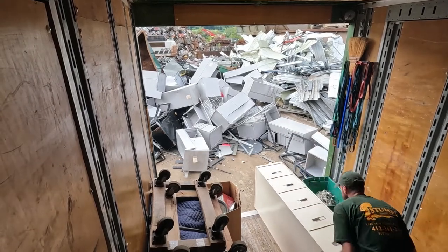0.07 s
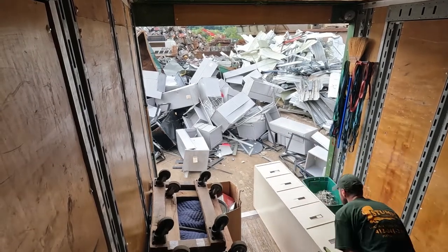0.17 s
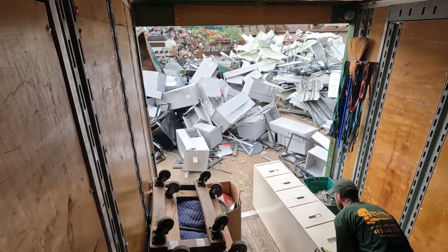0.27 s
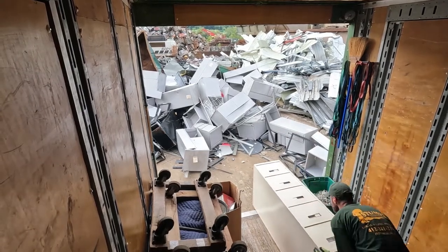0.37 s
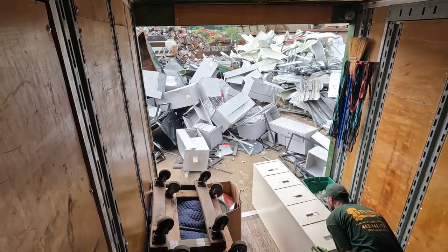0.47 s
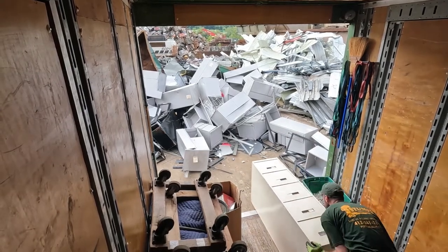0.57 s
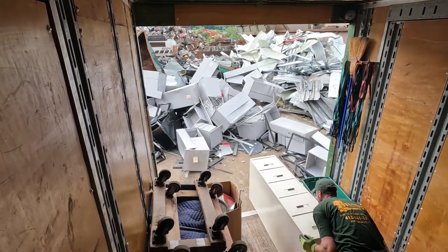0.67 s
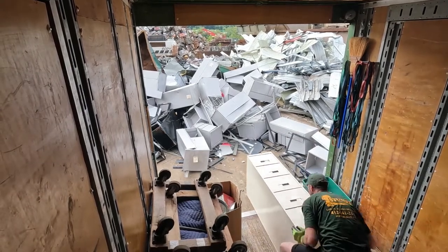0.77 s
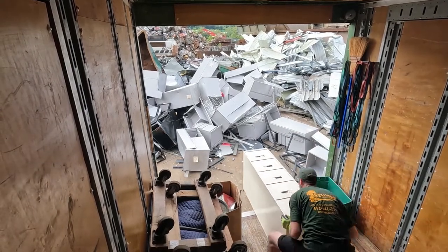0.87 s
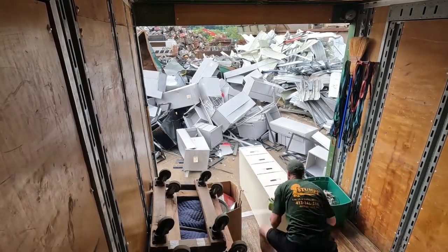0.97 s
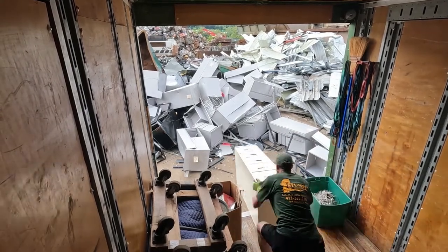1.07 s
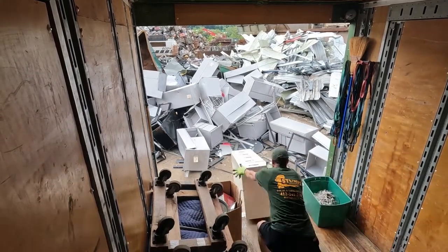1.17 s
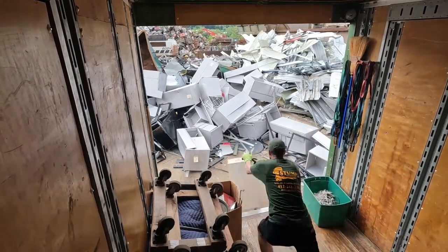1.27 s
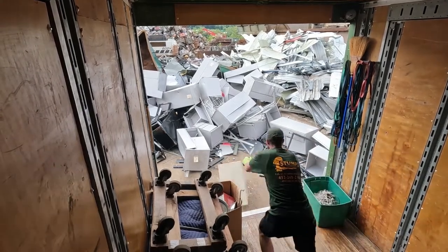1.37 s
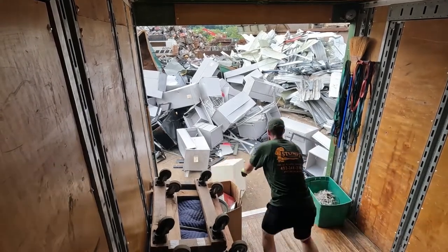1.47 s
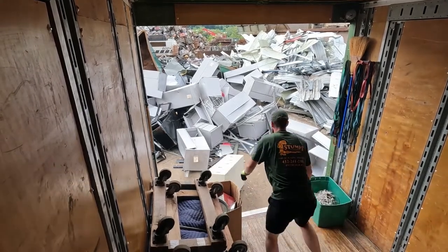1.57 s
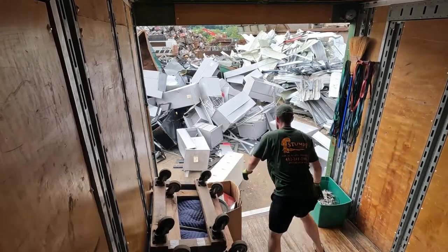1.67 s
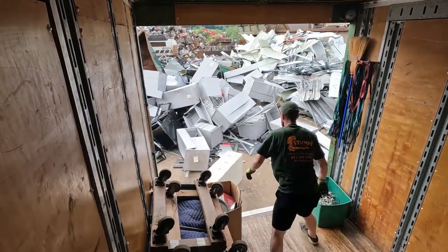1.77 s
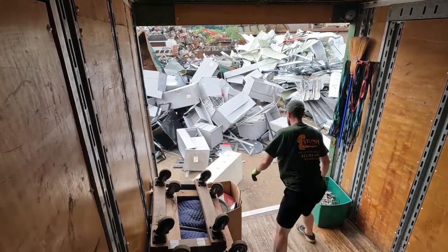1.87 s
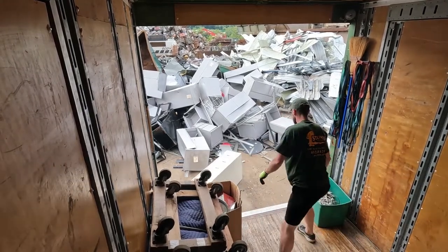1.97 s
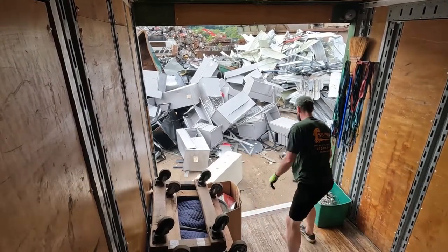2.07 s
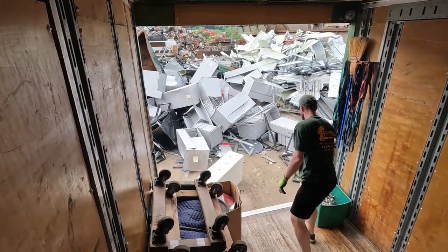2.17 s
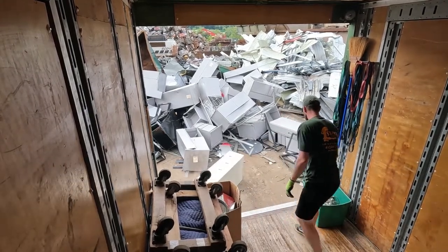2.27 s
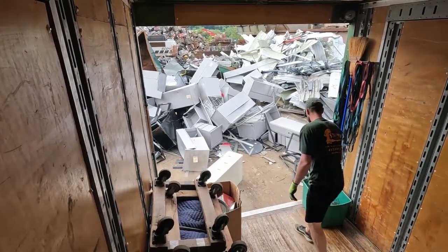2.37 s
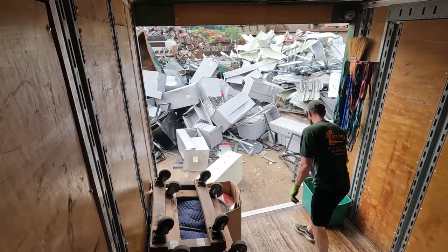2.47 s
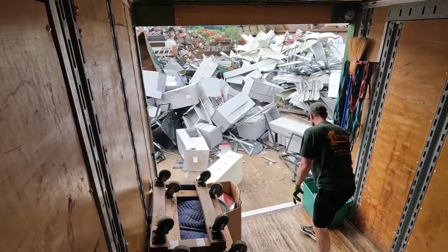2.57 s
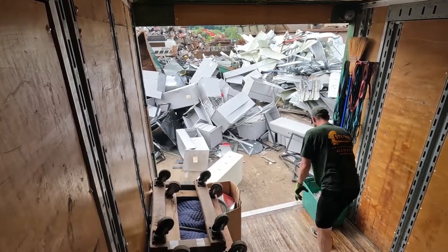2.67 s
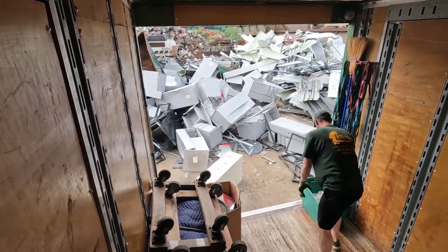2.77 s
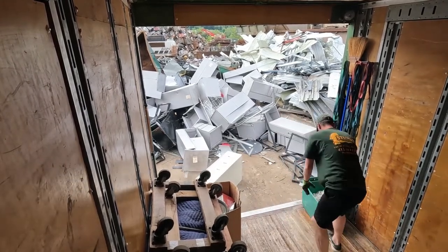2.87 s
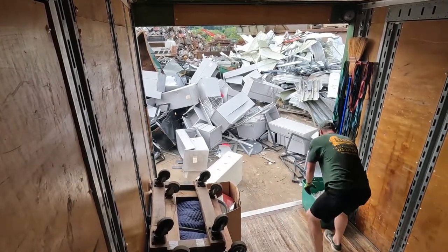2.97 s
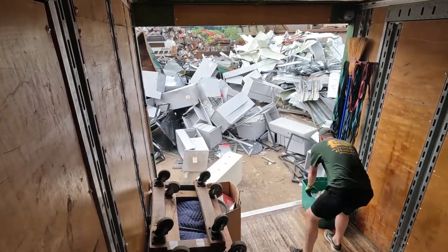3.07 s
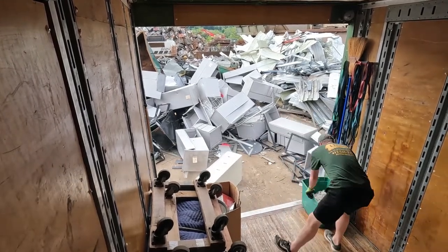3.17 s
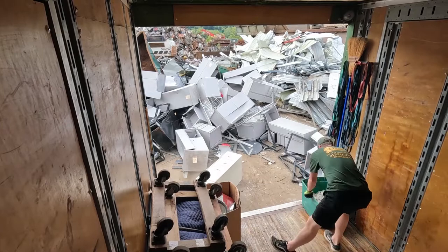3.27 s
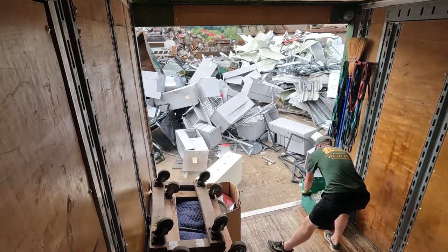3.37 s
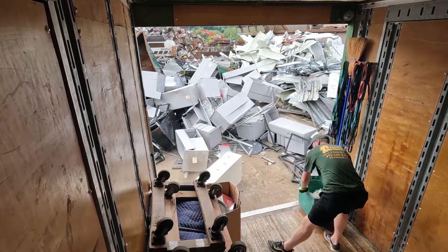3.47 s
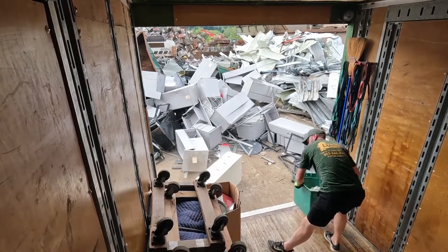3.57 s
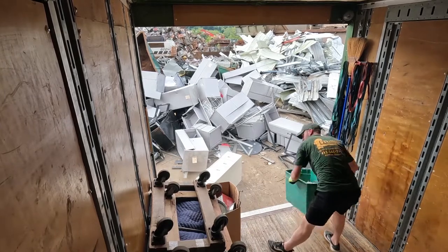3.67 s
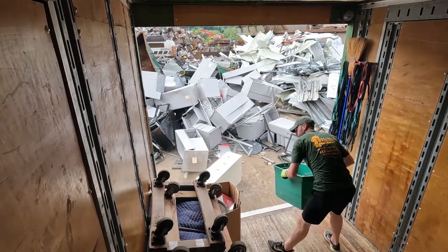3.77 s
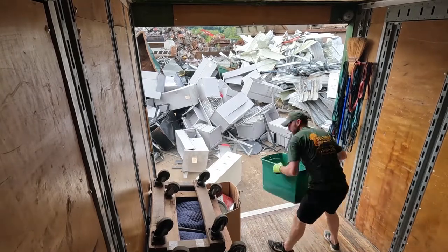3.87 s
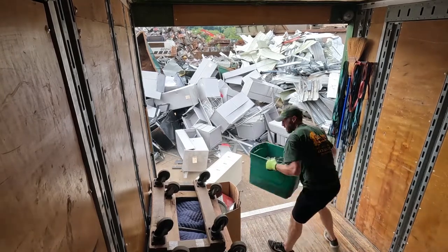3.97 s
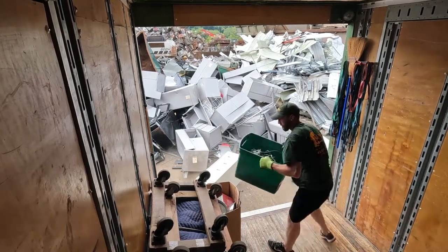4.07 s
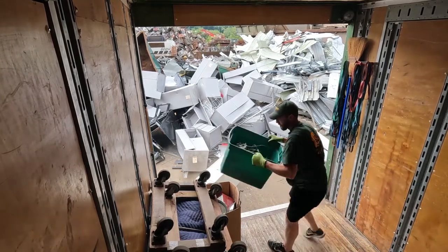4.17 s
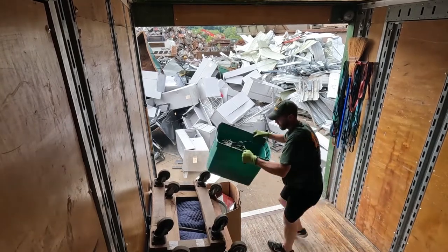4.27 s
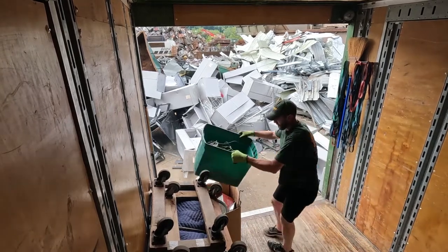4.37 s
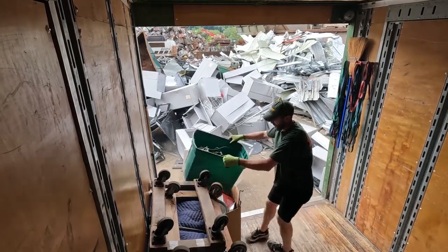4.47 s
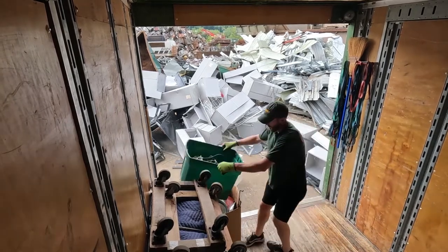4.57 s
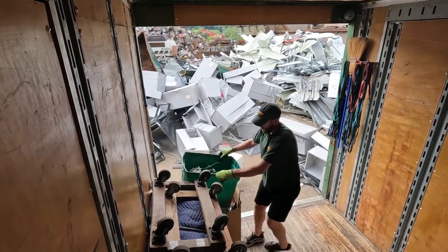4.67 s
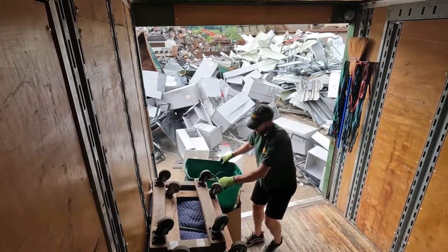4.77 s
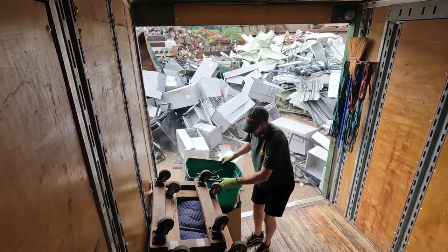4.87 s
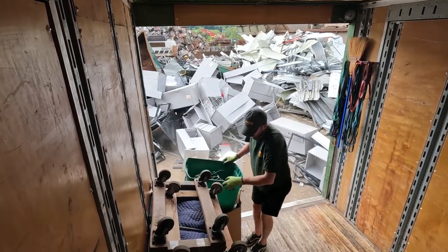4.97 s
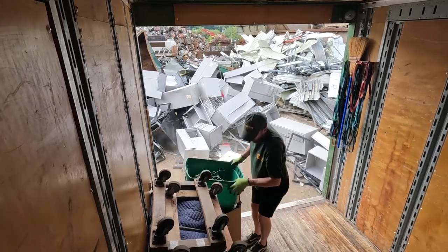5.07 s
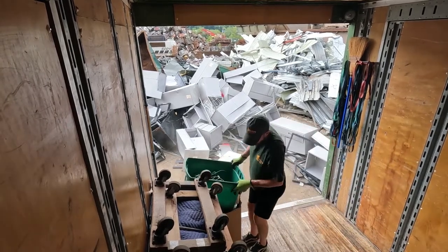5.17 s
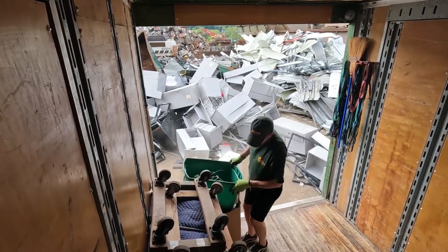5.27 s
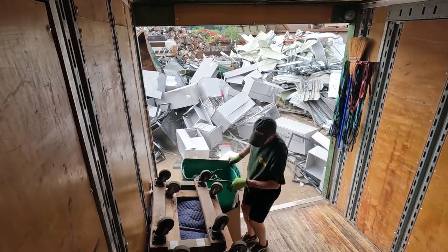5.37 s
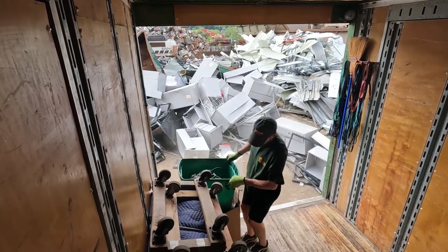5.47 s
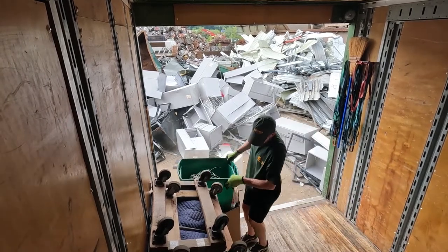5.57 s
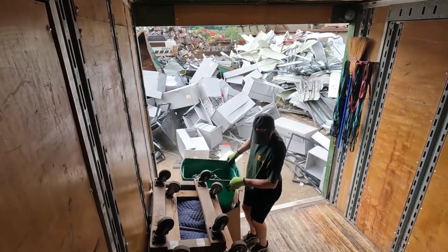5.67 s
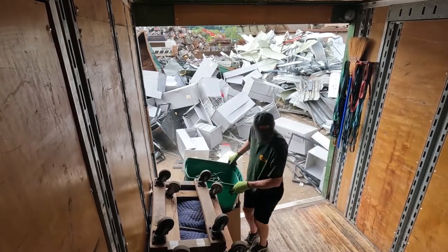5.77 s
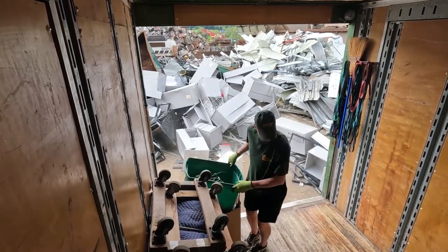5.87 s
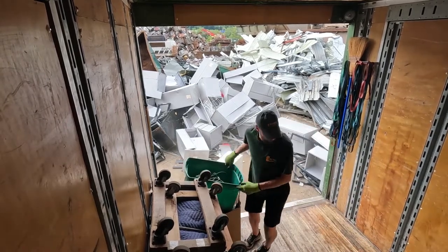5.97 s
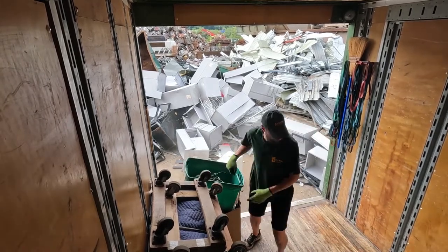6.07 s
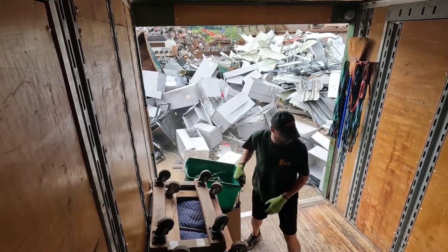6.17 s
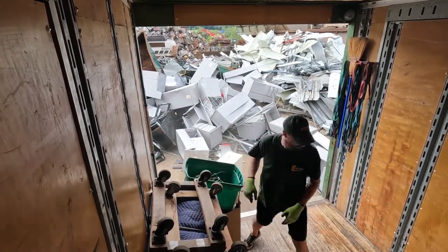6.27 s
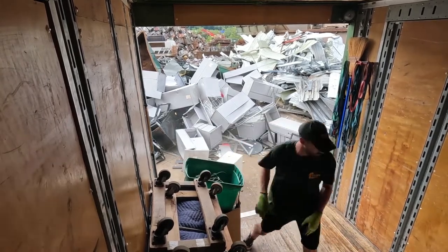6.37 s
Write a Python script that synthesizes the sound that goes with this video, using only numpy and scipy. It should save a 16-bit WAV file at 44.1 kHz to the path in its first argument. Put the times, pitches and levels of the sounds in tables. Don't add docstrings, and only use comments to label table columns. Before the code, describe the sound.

Inside a hollow truck box, a metal cabinet is shoved out with grinding and loud clanging, followed by footsteps and a parts bin set down hard.

```python
import sys
import numpy as np
from scipy import signal
from scipy.fft import rfft, irfft, next_fast_len
from scipy.io import wavfile
from scipy.ndimage import uniform_filter1d

SR = 44100
rng = np.random.default_rng(int(sys.argv[2]) if len(sys.argv) > 2 else 0)


def waveform_to_disk(signal):
    frames = np.transpose(np.atleast_2d(signal))
    scaled = np.clip(frames, -1, 1) * 32767
    samples = np.round(scaled).astype(np.int16)
    wavfile.write(sys.argv[1], SR, samples)


def how_loud(loudness_db):
    steps = np.asarray(loudness_db, float) / 20
    return 10 ** steps


N = 283959


def evened(x):
    return x / np.sqrt(np.mean(x ** 2) + 1e-20)


def read(points, hz):
    f, value = np.transpose(points)
    return np.interp(np.log(hz + 1), np.log(f + 1), value)


def colour(x, points):
    size = next_fast_len(x.shape[-1])
    gain = how_loud(read(points, np.fft.rfftfreq(size, 1 / SR)))
    return irfft(rfft(x, size) * gain, size)[..., :x.shape[-1]]


def split(x, hz):
    dull = signal.sosfiltfilt(signal.butter(2, hz, fs=SR, output="sos"), x)
    return evened(dull), evened(x - dull)


def ring(x, modes):
    total = 0
    for k, (hz, width, db) in enumerate(modes):
        b, a = signal.iirpeak(hz, hz / width, SR)
        total = total + (-1) ** k * how_loud(db) * signal.lfilter(b, a, x)
    return total


def slips(per_s, spread_db):
    size_db = spread_db * np.minimum(rng.exponential(1, N), 4)
    happens = rng.random(N) < per_s / SR
    return rng.standard_normal(N) * how_loud(size_db) * happens


def thud(x, body):
    low = evened(signal.sosfilt(signal.butter(2, 500, fs=SR, output="sos"), ring(x, body)))
    power = uniform_filter1d(uniform_filter1d(low ** 2, size=1500), size=1500)
    steady = 0.7
    return evened(low / (power + .05) ** (steady / 2))


def swings(events, rise_s, sag):
    out, t = np.zeros(N + 2 * SR), np.arange(SR) / SR
    for s, db, hz, t60 in events:
        swing = np.sin(2 * np.pi * hz * t * (1 - sag * np.minimum(t, .3)))
        envelope = how_loud(db - 60 * t / t60) * (1 - np.exp(-t / rise_s))
        out[round((s + 1) * SR):][:SR] += envelope * swing
    return out[SR:][:N]


def impacts(events, shell, pieces, body, crack_db, boom_db, fizz_db, rattle, fizz_s, bend):
    dull, bright = split(colour(slips(6000, 1.3), shell), 4310)
    dull = evened(dull + 0.5 * evened(ring(slips(600, 1.4), pieces)))
    boom = thud(slips(900, 2.0), body)
    out, t = np.zeros(N), np.arange(SR) / SR
    softening = 0.45
    for s, db, low_db, bright_db, t60 in events:
        start = round(s * SR)
        part = slice(start, min(start + SR, N))
        u = t[:part.stop - start]
        fall = how_loud(-60 * (np.maximum(u - rattle * t60, 0) / t60) ** bend)
        fizz = (1 - np.exp(-u / fizz_s)) * (1 + 1.45 * np.exp(-u / 0.025))
        crack_s = 0.0011 * how_loud(softening * max(-10 - db, 0))
        crack = (1 - np.exp(-u / crack_s)) * (1 + 0.25 * np.exp(-u / 0.0055))
        swell = 1 - np.exp(-u / 0.0094)
        out[part] += how_loud(bright_db + fizz_db) * fizz * fall * bright[part]
        out[part] += how_loud(db + crack_db) * crack * fall * dull[part]
        out[part] += how_loud(low_db + boom_db) * swell * fall * boom[part]
    return out


# frequency in Hz, level in dB, t60 in seconds.
BOARD_RING = [(58, -4, .3), (100, 0, 1.62), (109.2, -4, 0.81), (191, -6.5, .15), (263, -12.5, .4)]
CABINET = [(208, -0.5, 0.13), (328, -10, .22), (955, -5, .1), (1180, -16, .2)]
BIN_FLOOR = [(40, -20, 0.84), (115, -11.5, .31), (204, 0, .19), (259.4, -11, .2), (981, -10, 0.061),
             (1143, -29, 0.54), (2040, -19.5, 0.054), (2890, -19, .04), (3900, -24, .04), (5200, -25, .04),
             (6300, -21, .05)]
LOOSE_PART = [(3350, 1, .06), (7150, -8, .08)]
CARTON = [(191.7, 0.5, 0.11), (223, -3.5, 0.15), (860, -24, .058), (1144, -24, 0.063)]
BIN_RIM = [(38, 1, 0.36), (168, 0.5, .33), (298.7, -4, .23), (1916, -12, 0.11), (3640, -14, .05)]
# body struck, start in seconds, level in dB, pitch as a share of the mode's.
BLOWS = [(BOARD_RING, -0.00984, -13, 0.97), (CABINET, 1.482, -11, 1), (CABINET, 1.826, -4.5, 1.01),
         (CABINET, 1.6, -17, 1.03), (CABINET, 2.278, -21, 1.07), (CABINET, 2.712, -29, 1.0),
         (CABINET, 2.95, -29, 1.02), (BIN_FLOOR, 4.838, -1.7, 0.98), (LOOSE_PART, 4.862, -26, 1),
         (CARTON, 5.278, -9.5, 1), (CARTON, 5.297, -16, 1.1), (CARTON, 5.337, -29, 1.2),
         (BIN_RIM, 5.854, -18, 1)]


def blows():
    modes = []
    for body, s, db, pitch in BLOWS:
        for hz, mode_db, t60 in body:
            lag_s = min(0.785 / hz, .011)
            modes.append((s + lag_s, db + mode_db, hz * pitch, t60))
    return swings(modes, rise_s=0.0017, sag=0.11)


# start in seconds, crack in dB, boom in dB, fizz in dB, t60 in seconds.
CRASHES = [(0.0, -23, -9.5, -53, 0.74), (0.634, -38, -44, -60.5, 0.96), (0.873, -30.5, -18.5, -59, 1),
           (1.005, -24.5, -19, -63, 0.37), (1.086, -17.5, -10.5, -57, 0.95), (1.479, -9, -23, -35, 0.67),
           (1.634, -19, -48, -41.5, 0.56), (1.824, -9, -10, -33, 0.72), (2.082, -37, -28, -62, 0.76),
           (2.262, -25, -20, -51, 0.48), (2.315, -35.5, -16.5, -61, 0.48), (2.511, -32, -23, -58.5, 0.29),
           (2.549, -32, -20, -69, 0.52), (2.706, -28.5, -20, -61.5, 0.8), (2.785, -32, -22.5, -50.5, 0.24),
           (2.917, -36, -22, -56, 0.67), (3.069, -35, -23, -73, 0.79), (3.29, -41, -26.5, -69, 0.78),
           (3.36, -38, -26, -70, 0.6), (3.425, -31, -20.5, -68, 0.5), (3.657, -35.5, -30, -70, 1)]
# frequency in Hz, density in dB per Hz.
STEEL = [(250, -25), (330, -4), (500, -5), (720, -3), (900, -2), (1170, -2), (1660, -8), (2530, -13),
         (6600, -23), (8600, -35), (10500, -37), (12000, -36), (13700, -43), (15500, -58)]
# frequency in Hz, width in Hz, level in dB.
PANELS = [(950, 70, 0), (1160, 70, 0), (1290, 70, -2), (1420, 80, -3), (1830, 100, -8), (2400, 120, -10)]
# frequency in Hz, width in Hz, level in dB.
BOARDS = [(36, 13, -6.5), (57.7, 32.6, 0), (84.8, 20.7, 5), (118.5, 9.7, 6.5), (168, 32.5, -1.5),
          (216.7, 28.5, -1.5), (260.3, 34, -3.5), (330.3, 29.5, -6.5), (402, 74, -15.5)]


def crashes():
    return impacts(CRASHES, STEEL, PANELS, BOARDS, crack_db=-10.5, boom_db=-10.0, fizz_db=0,
                   rattle=0.052, fizz_s=.0005, bend=0.95)


# frequency in Hz, density in dB per Hz.
YARD = [(15, -23), (25, 4.5), (43, 1), (81, 4), (115, -1), (147, 4), (190, -4), (283, -12.5), (420, -23.5),
        (3400, -40), (7200, -51), (8600, -62), (12300, -69.5), (14000, -88)]
# time in seconds, gain in dB.
GAIN = [(0.2, 0.5), (.35, -5), (.6, 1), (2.2, -4), (2.5, 1), (2.85, -6), (3.4, 0), (4.3, 0), (4.6, 3.5),
        (5.04, -4.5), (5.4, -2.5), (6.0, 0), (6.44, 3)]


def yard():
    t = np.arange(N) / SR
    gain_db = np.interp(t, *np.transpose(GAIN))
    low, high = split(colour(rng.standard_normal(N), YARD), 343)
    lumps = evened(uniform_filter1d(uniform_filter1d(rng.standard_normal((2, N)), 2000), 2000))
    rumble_db = -29.5 + .5 * gain_db - 1.1 * t + 1.14 * lumps[0]
    hiss_db = -44.5 + gain_db + 0.42 * lumps[1]
    return how_loud(rumble_db) * low + how_loud(hiss_db) * high


# start in seconds, crack in dB, boom
# in dB, fizz in dB, t60 in seconds.
KNOCKS = [
    (0.3, -37, -24.5, -51, 0.35),
    (4.647, -28.5, -32, -44.5, 0.35),
    (4.741, -33, -29, -45, 0.65),
    (4.838, -11, -5, -24, 0.35),
    (4.863, -19, -44, -32, 0.44),
    (5.277, -31.5, -12.5, -60, 0.18),
    (5.852, -15.5, -9, -36.5, 0.21),
    (5.902, -26.5, -49, -53, 0.27),
    (6.358, -30, -49, -41.5, 0.28),
]
# frequency in Hz, density in dB per Hz.
PLASTIC = [(250, -28), (420, 2.5), (690, -6.5), (1130, -4), (1780, -8), (2640, -13), (3290, -12.5),
           (6340, -24), (6920, -24), (8000, -32), (11500, -42), (13700, -48)]
# frequency in Hz, width in Hz, level in dB.
PARTS = [(1000, 140, 15), (1080, 59, -9), (1516, 100, 5), (2130, 100, 4), (3340, 300, -0.5)]
# frequency in Hz, width in Hz, level in dB.
BIN = [(115, 30, 0), (150, 30, -1), (195, 40, -6), (250, 40, -3), (300, 50, -7)]


def knocks():
    return impacts(KNOCKS, PLASTIC, PARTS, BIN, crack_db=-14, boom_db=-9.5, fizz_db=-13,
                   rattle=0.14, fizz_s=0.0067, bend=1.18)


# time in seconds, force in dB.
STROKES = [
    [(.55, -32), (.65, -20), (.83, -9.5), (.91, -15.5), (1.07, -10.5), (1.13, -2.5), (1.19, 0.5),
     (1.35, -4), (1.47, -18)],
    [(1.51, 0), (1.64, -1.5), (1.76, -2), (1.815, -10)],
    [(1.86, -3.5), (1.9, -5.5), (1.97, -3), (2.12, -18.5), (2.25, -27)],
]
# frequency in Hz, density in dB per Hz.
GRIT = [(1060, -35), (1800, -10), (2210, -10), (2400, -9), (2570, -12), (3150, -7), (4360, -20),
        (7070, -18.5), (8460, -27.5), (12100, -28.5), (13700, -40)]
# level at full force in dB, dB per dB of force, extra on scrap in dB.
RUMBLE_LAW = (-13.5, 1.035, -0.95)
RASP_LAW = (-27, 1.35, 2.7)
GRIT_LAW = (-40.5, 1.28, 9)


def slide():
    t, gains = np.arange(N) / SR, np.zeros((3, N))
    full_db, slope, scrap_db = np.transpose([RUMBLE_LAW, RASP_LAW, GRIT_LAW])[..., None]
    for k, rows in enumerate(STROKES):
        s, force_db = np.transpose(rows)
        inside = np.clip(np.minimum(t - s[0] + 0.036, s[-1] + 0.015 - t) / 0.0091, 0, 1)
        on_scrap = k > 0
        gains += inside * how_loud(full_db + slope * np.interp(t, s, force_db) + scrap_db * on_scrap)
    rumble = thud(slips(900, 1.66), BOARDS)
    edge = slips(3000, 0.58)
    rasp = evened(ring(edge, PANELS)) + 1.4 * evened(colour(edge, STEEL))
    grit = colour(slips(6000, 0.78), GRIT)
    return sum(gain * evened(layer) for gain, layer in zip(gains, (rumble, rasp, grit)))


# time in seconds, level in dB, frequency in Hz.
SQUEAL = [
    [(.92, -46, 955), (.94, -36.5, 980), (.99, -34, 980), (1.03, -40, 962), (1.06, -33, 972),
     (1.095, -25.5, 955), (1.122, -37, 946)],
    [(1.16, -44, 1148), (1.195, -20.5, 1178), (1.23, -27, 1150)],
]


def squeal():
    out = np.zeros(N)
    for rows in SQUEAL:
        s, db, hz = np.transpose(rows)
        t = np.arange(s[0], s[-1], 1 / SR)
        waver = evened(uniform_filter1d(rng.standard_normal((2, SR)), 400))[:, :len(t)]
        turns = np.cumsum(np.interp(t, s, hz) * (1 + .018 * waver[0])) / SR
        level = how_loud(np.interp(t, s, db) + 2.5 + 1.8 * waver[1])
        out[round(s[0] * SR):][:len(t)] += level * np.sin(2 * np.pi * turns)
    return out


# start in seconds, level in dB, frequency in Hz, width in Hz, length in seconds.
SQUEAKS = [
    (1.13, -27, 1400, 300, .14),
    (2.082, -52, 7100, 900, .11),
    (2.7, -54, 6300, 1200, .035),
    (4.86, -46, 7150, 150, .07),
    (5.19, -70, 7150, 60, .13),
]


def squeaks():
    noise, out = rng.standard_normal(SR), np.zeros(N)
    for s, db, hz, width, length in SQUEAKS:
        mode = [(hz, width, 0)]
        band = evened(ring(ring(noise, mode), mode))[-round(length * SR):]
        out[round(s * SR):][:len(band)] += how_loud(db) * evened(band) * signal.windows.tukey(len(band), .6)
    return out


# start in seconds, level in dB, frequency in Hz, t60 in seconds.
THUMPS = [(1.838, -10, 82, 0.21), (2.289, -8, 126, 0.1), (2.349, -33, 128, 0.15), (2.526, -8, 90, 0.12),
          (2.549, -9, 88, 0.08), (2.738, -16.5, 87, 0.097), (2.764, -12.5, 99, 0.085),
          (2.944, -11.5, 85, 0.21), (3.122, -11.5, 91.8, 0.29), (3.315, -19, 79, 0.21),
          (3.459, -14, 80, 0.27), (3.63, -16, 77.6, 0.34), (4.149, -24, 72, 0.23), (4.398, -50, 110, 0.14),
          (6.055, -22, 146, 0.16), (6.15, -21, 158, 0.15), (6.22, -20, 38, .6), (6.36, -19, 55, .4)]


def thumps():
    return how_loud(-2.5) * swings(THUMPS, rise_s=0.0067, sag=0.165)


# frequency in Hz, reflected level in dB.
WALL_LOSS = [(500, 0), (3000, -3), (10000, -12)]


def walls(x, t60):
    at = np.arange(40, SR // 2, 20) + rng.integers(0, 20, (SR // 2 - 21) // 20)
    taps = np.zeros(SR)
    taps[at] = rng.choice([-1., 1.], len(at)) * how_loud(-60 * at / SR / t60)
    reflected = signal.fftconvolve(x, taps / np.linalg.norm(taps))[:N]
    return colour(reflected, WALL_LOSS)


def scattered(x):
    z = signal.stft(x, nperseg=256, noverlap=128)[2]
    phases = np.exp(2j * np.pi * rng.random(z.shape))
    return np.sqrt(2) * signal.istft(z * phases, nperseg=256, noverlap=128)[1][:N]


# frequency in Hz, level in dB.
SIDE_DB = [(60, -32), (130, -30.5), (280, -21.5), (610, -14), (1310, -5.5), (2840, -3.5), (6140, -7.5),
           (13300, 0.5)]
# frequency in Hz, level in dB.
LEFT_DB = [(100, 0), (300, .6), (1200, 1.7), (5000, 1.2), (10000, 3.3)]


def ports(mid):
    side = how_loud(-2.5) * colour(scattered(mid), SIDE_DB)
    left_lean = [(hz, db / 2) for hz, db in LEFT_DB]
    right_lean = [(hz, -db / 2) for hz, db in LEFT_DB]
    return np.array([colour(mid + side, left_lean), colour(mid - side, right_lean)])


def scene():
    near = blows() + crashes() + knocks() + slide() + squeal() + squeaks() + thumps()
    return ports(near + how_loud(-10.5) * walls(near, t60=0.49) + yard())


def top_cut(x):
    return signal.sosfilt(signal.butter(12, 15700, fs=SR, output="sos"), x)


def record(dry):
    heard = signal.sosfilt(signal.butter(6, 13700, fs=SR, output="sos"), dry)
    limited = 1.5 * np.tanh(heard / 1.5)
    return top_cut(limited)


dry = scene()
out = record(dry)
waveform_to_disk(out)
```